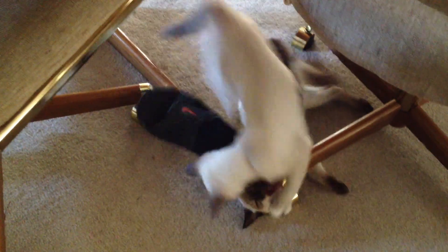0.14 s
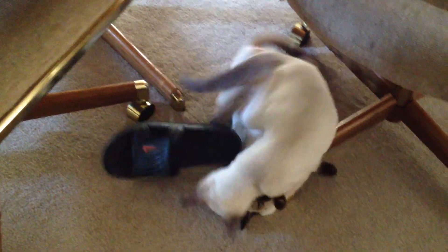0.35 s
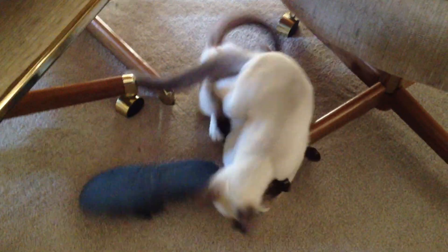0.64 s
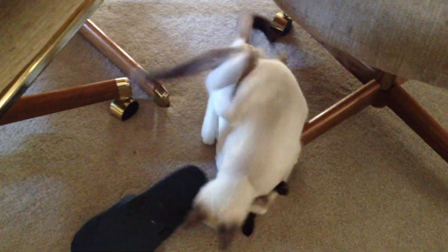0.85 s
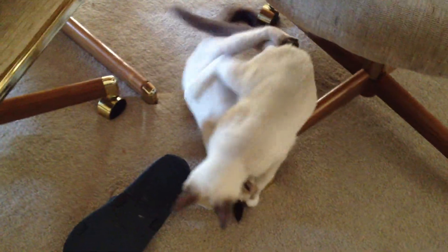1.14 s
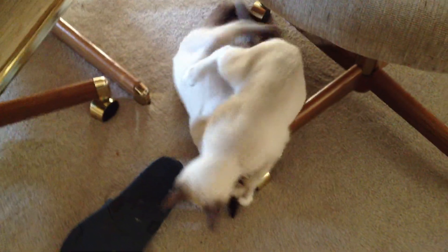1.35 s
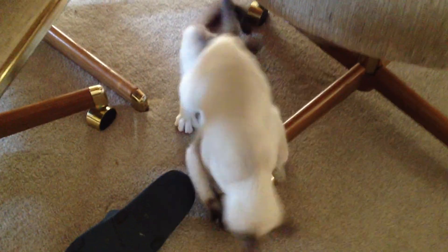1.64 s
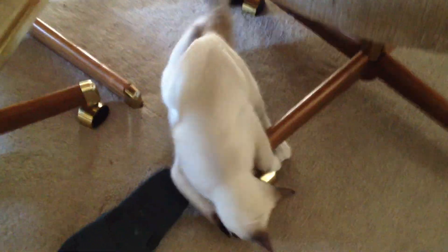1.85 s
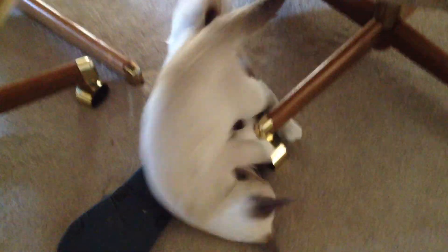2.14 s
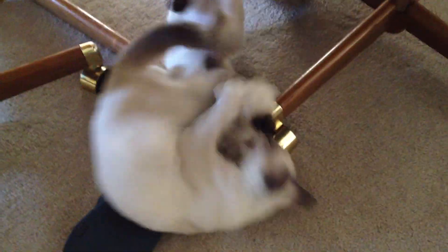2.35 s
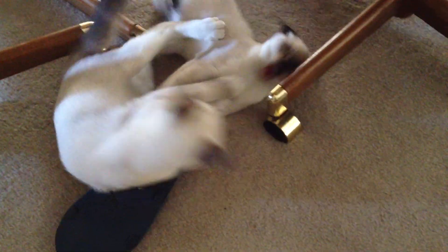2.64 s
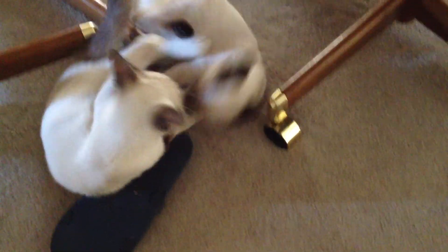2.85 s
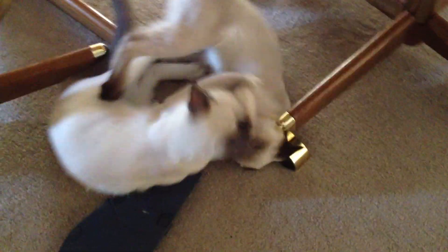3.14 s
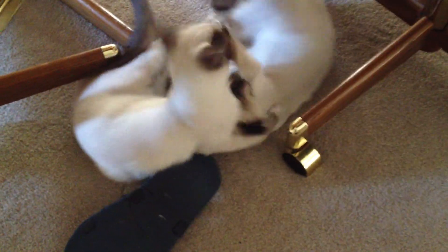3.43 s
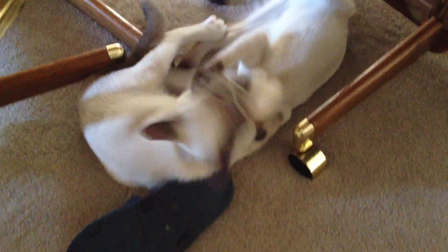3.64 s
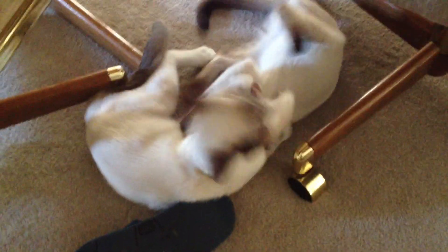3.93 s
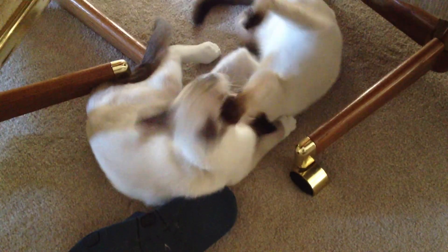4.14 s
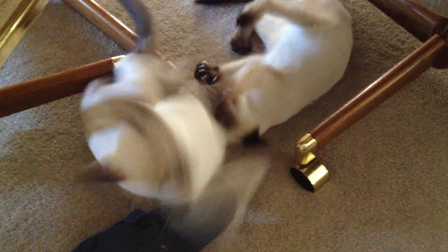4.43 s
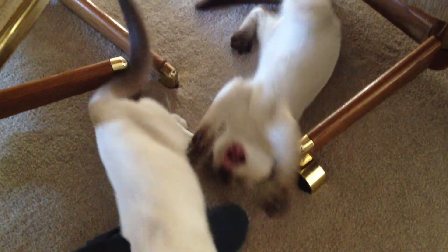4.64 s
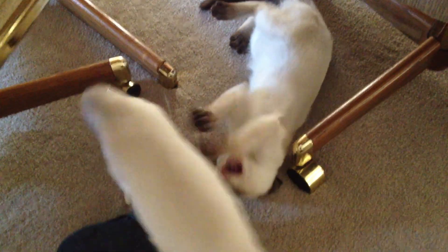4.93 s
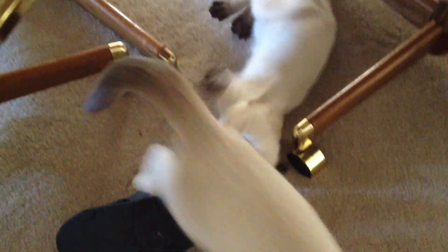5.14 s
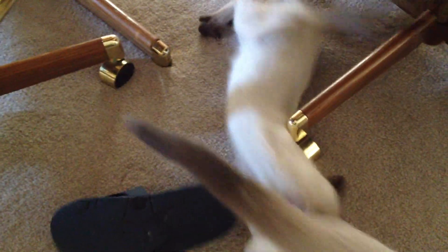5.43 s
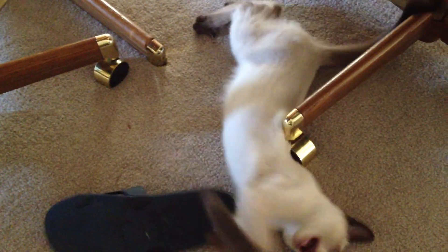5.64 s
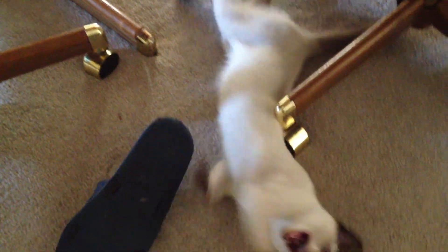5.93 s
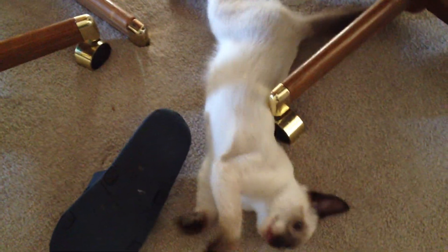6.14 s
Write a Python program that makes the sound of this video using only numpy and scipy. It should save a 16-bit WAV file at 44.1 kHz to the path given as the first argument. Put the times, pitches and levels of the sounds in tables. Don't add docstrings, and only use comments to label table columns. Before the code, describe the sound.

A cat's long hoarse yowl rises, falls and wavers into breath, then bodies scuffle on carpet and knock sharply against a wooden chair.

```python
import sys
import numpy as np
from scipy import signal
from scipy.fft import rfft, irfft
from scipy.io import wavfile
from scipy.ndimage import uniform_filter1d

SR = 44100
rng = np.random.default_rng(int(sys.argv[2]) if len(sys.argv) > 2 else 0)


def transcribe(u):
    v = np.clip(np.atleast_2d(u).T, -1, 1)
    q = np.round(v * 32767).astype(np.int16)
    wavfile.write(sys.argv[1], SR, q)


def volts_from_decibels(level):
    exponent = np.asarray(level, float) / 20
    return 10 ** exponent


N = 276948
TIME = np.arange(N) / SR


def rms_one(x):
    return x / np.sqrt(np.mean(x ** 2) + 1e-20)


def in_time(rows):
    s, *columns = np.transpose(rows)
    return [np.interp(TIME, s, c) for c in columns]


def gate(start, end, edge):
    return np.clip(np.minimum(TIME - start, end - TIME) / edge, 0, 1)


def at_hz(points, hz):
    table_hz, value = np.array(points).T[:2]
    return np.interp(np.log(hz + 1), np.log(table_hz), value)


def drift(rate_hz):
    r = np.exp(-2 * np.pi * rate_hz / SR)
    settle = 9000
    return rms_one(signal.lfilter([1], [1, -2 * r, r * r], rng.standard_normal(N + settle))[settle:])


def ring(x, hz, t60):
    r = volts_from_decibels(-60 / (max(t60, .002) * SR))
    w = 2 * np.pi * hz / SR
    return signal.lfilter([0, np.sin(w)], [1, -2 * r * np.cos(w), r * r], x + 1e-18)


def band(x, low_hz, high_hz):
    sos = signal.butter(2, [low_hz, min(high_hz, .45 * SR)], "band", fs=SR, output="sos")
    return signal.sosfilt(sos, x)


def peak(hz, centre_hz, width_hz):
    return 1 / (1 + ((hz - centre_hz) / width_hz) ** 2)


def add(out, s, sound):
    i = round(s * SR)
    out[i:i + len(sound)] += sound[:N - i]


def hush():
    # frequency_hz, density_db
    spectrum = [(18, -67), (30, -22), (59, -29), (106, -7), (227, 2), (384, -11), (499, -5), (740, -9.5),
                (3310, -17.5), (5450, -18), (6900, -25.5), (8080, -19), (9710, -27), (14400, -21),
                (16000, -27)]
    hz = np.linspace(0, SR / 2, N // 2 + 1)
    noise = irfft(rfft(rng.standard_normal(N)) * volts_from_decibels(at_hz(spectrum, hz)), N)
    return volts_from_decibels(-67) * rms_one(noise)


def scuffle():
    # time_s, weight_on_floor_db, fur_speed_db
    effort = [(0.0, -66.5, -78), (0.14, -59.5, -74.5), (0.28, -64, -72), (0.44, -67.5, -68),
              (1.35, -67, -75), (2.33, -68, -70.5), (2.75, -71, -69), (3.02, -66.5, -73),
              (3.32, -60, -72.5), (3.6, -69.5, -73), (3.9, -62, -73.5), (4.07, -76, -75), (4.3, -73, -77),
              (4.48, -69, -70), (4.81, -72, -80.5), (5.18, -70, -76), (5.6, -66.5, -76.5),
              (6.28, -74.5, -77.5)]
    # low_hz, high_hz
    contact_bands = [
        (110, 342),
        (400, 2250),
        (6100, 7680),
        (11500, 28000),
    ]
    # start_s, length_s, rub_db
    hauls = [(0.291, .1, -60), (0.39, 0.054, -62), (1.725, 0.36, -68.5), (2.19, 0.31, -77.5),
             (3.19, 0.27, -67.5), (3.797, 0.26, -82), (4.428, 0.16, -74), (5.385, 0.13, -74)]
    # start_s, length_s, swish_db,
    # bristle_db
    strokes = [(2.11, 0.044, -74, -87), (2.301, 0.068, -68, -73), (2.446, 0.12, -74.5, -70),
               (0.033, 0.13, -77.5, -81), (2.785, 0.13, -61, -78), (4.52, 0.069, -68, -86),
               (3.603, 0.24, -75.5, -78), (3.933, 0.18, -71, -81), (4.289, 0.065, -68, -89),
               (4.41, 0.057, -72, -81), (4.645, 0.074, -74, -69), (5.152, 0.09, -82, -83),
               (5.485, 0.11, -72, -74), (5.743, 0.068, -78, -70), (5.89, 0.055, -72.5, -89),
               (6.017, 0.03, -81, -82)]
    weight_db, speed_db = in_time(effort)
    rub_db = 0.33 * weight_db + 0.67 * speed_db
    gains = [volts_from_decibels(weight_db - 2), volts_from_decibels(rub_db - 8), volts_from_decibels(speed_db - 2.5), volts_from_decibels(speed_db - 10.5)]
    edge_s = 0.024
    for s, length, db in hauls:
        gains[1] += volts_from_decibels(db) * gate(s, s + length, edge_s)
    for s, length, swish_db, bristle_db in strokes:
        stroke = gate(s, s + length, edge_s)
        gains[2] += volts_from_decibels(swish_db) * stroke
        gains[3] += volts_from_decibels(bristle_db) * stroke
    out, clump = 0, drift(14.6)
    for gain, (low_hz, high_hz) in zip(gains, contact_bands):
        caught = rng.random(N) < 900 / SR
        grains = caught * rng.choice([-1, 1], N) * volts_from_decibels(1.9 * np.minimum(rng.exponential(1, N), 5))
        rub = rms_one(band(rng.standard_normal(N) + 1.2 * rms_one(grains), low_hz, high_hz))
        out += rub * gain * volts_from_decibels(2.0 * clump + 2.1 * drift(21))
    return out


def ticks():
    # start_s, peak_db
    claws = [(2.336, -53), (2.475, -48), (2.494, -44), (3.795, -42.5), (4.299, -47), (5.161, -52),
             (5.511, -41.5), (5.532, -47), (5.538, -40.5), (5.548, -46.5)]
    # start_s, peak_db, centre_hz, breadth_octaves
    taps = [(0.052, -45.5, 790, 1.4), (.177, -45, 1030, 1), (.216, -47, 2600, 2), (.356, -54, 4420, 1.2),
            (0.376, -44, 4330, 2.1), (1.507, -42, 618, 1.95), (1.771, -50, 703, 1.2),
            (3.374, -40, 3800, 0.45), (3.838, -50, 1000, 1.1), (3.798, -50, 1500, 1.2),
            (3.903, -38, 2770, 0.8)]
    contacts = [(s, db, 6660, 0.8, 0.0055) for s, db in claws]
    for s, db, hz, octaves in taps:
        contacts.append((s, db, hz, octaves, 0.0035 + 4.4 / hz))
    out, age = np.zeros(N), np.arange(2000) / SR
    for s, db, hz, octaves, length in contacts:
        spread = 2 ** (octaves / 2)
        burst = rng.standard_normal(len(age)) * np.exp(-age / (length / 3))
        snap = band(burst, hz / spread, hz * spread)
        add(out, s, volts_from_decibels(db) * snap / np.abs(snap).max())
    return out


def thuds():
    # start_s, peak_db, pitch_hz, t60_s
    falls = [(0.069, -45.5, 275, 0.089), (0.093, -43, 236, 0.038), (0.129, -49, 196, 0.073),
             (0.189, -48.5, 190, 0.055), (0.321, -38.5, 200, 0.027), (0.346, -46, 213, 0.042),
             (0.373, -37.5, 257, 0.043), (0.429, -45.5, 236, 0.044), (0.695, -55, 226, 0.18),
             (1.372, -51.5, 244, 0.068), (1.524, -38, 199, 0.061), (1.63, -62, 223, 0.035),
             (2.33, -54, 215, 0.077), (2.884, -51.5, 234, 0.21), (3.067, -54, 214, 0.11),
             (3.198, -43, 235, .1), (3.299, -48, 260, 0.1), (3.793, -44.5, 175, 0.059),
             (3.908, -39.5, 242.5, 0.17), (2.63, -41, 228.3, 0.18), (4.538, -24, 212, 0.05),
             (4.586, -43.5, 326, 0.044), (4.609, -46, 280, 0.042), (4.685, -49, 204, 0.025),
             (4.842, -48.5, 202, 0.039), (5.17, -53, 221, 0.03), (5.65, -50.5, 148, 0.094),
             (5.835, -56, 230, 0.2)]
    push = np.zeros(9000)
    push[:60] = np.hanning(60) / 30
    out = np.zeros(N)
    for s, db, hz, t60 in falls:
        overtone = 0.22 * ring(push, 1.414 * hz, 1.7 * t60)
        add(out, s, volts_from_decibels(db) * (ring(push, hz, t60) + overtone))
    return out


def yowl():
    # time_s, pitch_hz, level_db, mouth_open_db, chest_db
    pushes = [
        [(.225, 646.4, -67, 12, 0), (.3, 797, -63.5, 16, -5), (.316, 873, -63, 17, -20),
         (.385, 895, -61, 20, -22), (.405, 948, -60.5, 20, -20), (.413, 1040, -57, 16.5, -9),
         (.48, 1099, -53.5, 14, -2), (.5, 1037, -52, 2, -17), (.526, 1013, -53, 8, -18)],
        [(.561, 855, -47, 3, -32), (.632, 793, -51.5, -4, -14.5), (.704, 655, -56, -4, -7),
         (.722, 645, -56, 0, -8), (.738, 682, -56, 5, -9), (.758, 626, -57, 8, -11), (.836, 612, -63, 14.5, -4),
         (.858, 650, -61.5, 11, -8), (.908, 640, -60, 11, -4)],
        [(.935, 615, -59.5, 10, -2.5), (.975, 636, -51, 0, -15), (1.01, 627, -49.5, -5.5, -19.5),
         (1.032, 605, -54.5, -11.5, -17), (1.08, 593, -56, -18, -12)],
        [(1.097, 558, -58, -20, -10), (1.112, 535, -51, -18, -11.5), (1.132, 501, -45, -14, -12),
         (1.168, 495.3, -48.5, -16, -13), (1.2, 512, -44.5, -13, -15), (1.222, 537, -43.5, -10, -20),
         (1.27, 510.6, -44.5, -15, -15), (1.36, 489.5, -56, -23.5, -3.5), (1.49, 469.5, -68.5, -22, -0.5)],
    ]
    # time_s, mouth_hz, top_brightness_db
    tongue = [(.225, 2300, -6), (.4, 2250, -5), (.5, 2250, 0), (.65, 2370, 0), (.75, 2250, 5.5),
              (.9, 2250, 4.5), (1.02, 2250, 4), (1.12, 2250, 0), (1.49, 2180, -2)]
    # centre_hz, width_hz, level_db
    throat = [(4200, 355, -12.5), (4920, 730, -29.5), (6480, 590, -28)]
    rows = np.concatenate(pushes)
    start_s, end_s = rows[0][0], rows[-1][0]
    end = round(end_s * SR)
    pitch, level_db, open_db, chest_db = np.array(in_time(rows))[:, :end]
    mouth_hz, bright_db = np.array(in_time(tongue))[:, :end]
    ends = np.exp(-np.abs(TIME[:end] - start_s) / .04) + np.exp((TIME[:end] - end_s) / .16)
    rough = .26 - .011 * (level_db + 55) + .55 * ends
    longer = 1 + 0.0056 * np.clip(open_db, -14, 0)
    pitch = pitch * (1 + .0055 * drift(45)[:end] + .05 * rough * drift(110)[:end])
    warble_hz = 70 + 12 * drift(8)[:end]
    pitch *= 1 + .009 * np.sin(2 * np.pi * np.cumsum(warble_hz) / SR)
    phase, out, power = 2 * np.pi * np.cumsum(pitch) / SR, 0, 1e-12
    wander, flutter = drift(13.0), drift(100)
    for k in range(1, 17):
        hz = k * pitch
        gain = peak(hz, mouth_hz, 665) ** 2.8 + volts_from_decibels(chest_db) * peak(hz, 1090, 660)
        lowest, *top = [volts_from_decibels(db) * peak(hz, at * longer, width) for at, width, db in throat]
        gain += volts_from_decibels(open_db) * (lowest + volts_from_decibels(bright_db) * sum(top))
        gain *= 1 - 0.49 * peak(hz, 3260, 320)
        power += gain ** 2 / 2 * (np.abs(hz - 2400) < 900)
        blur = 1 + rough * (.2 + hz / 4000) * flutter[9001 * k:][:end]
        line = np.sin(k * phase + rng.uniform(0, 2 * np.pi))
        out += gain * (hz < 9200) * blur * volts_from_decibels(2.5 * wander[7001 * k:][:end]) * line
    evened = out / np.sqrt(uniform_filter1d(power, size=600)) * volts_from_decibels(level_db)
    return np.pad(evened, (0, N - end)) * gate(start_s, end_s, 0.004)


def pants():
    # start_s, length_s, level_db, mouth_open_db
    breaths = [(0.236, 0.11, -65, 8), (.66, 0.15, -68.5, 4), (1.338, 0.17, -64, -12),
               (1.471, 0.21, -64, -10.5), (1.773, 0.24, -70.5, 2), (6.124, 0.12, -67, 5.5)]
    # centre_hz, width_hz, level_db
    mouth = [(2250, 430, 10.5), (4520, 350, 1), (6800, 1400, -2.5), (12600, 6800, -18)]
    air, hz = rfft(rng.standard_normal(N)), np.linspace(0, SR / 2, N // 2 + 1)
    first, *upper = [irfft(air * volts_from_decibels(db) * peak(hz, at, width) ** 1.36, N) for at, width, db in mouth]
    out = 0
    for s, length, level_db, open_db in breaths:
        swell_db = -4 * np.clip(2 * (TIME - s) / length - 1, -1, 1) ** 2
        breath = first + volts_from_decibels(open_db) * sum(upper)
        out += volts_from_decibels(level_db + swell_db) * breath * gate(s, s + length, 0.017)
    return out / first.std() * volts_from_decibels(0.5 * drift(30))


def caster():
    # start_s, peak_db
    contact = (.259, -28)
    # pitch_hz, level_db, t60_s
    modes = [(1400, -47, 0.032), (2556, -3.5, 0.028), (4040, -5.5, 0.018), (5870, -9, 0.0049),
             (7330, -10, 0.021), (8300, -11.5, 0.027)]
    s, peak_db = contact
    click = np.zeros(N)
    blow_and_rebound = np.array([0.82, 0.41, 0.18, -0.32, -0.8] + [0] * 30 + [.7])
    add(click, s, volts_from_decibels(peak_db) * blow_and_rebound)
    return sum(volts_from_decibels(db) * ring(click, hz, t60) for hz, db, t60 in modes)


def snaps():
    # start_s, peak_db, tilt_db
    loops = [(.2595, -38, 8), (.264, -48, 6), (0.417, -46, 2), (0.43, -46, 2), (1.5063, -46, 2),
             (2.2477, -42, 0), (2.318, -52, 2), (2.359, -48, 3), (2.475, -43, 1), (2.493, -40, -1),
             (3.5994, -52, 3), (3.6344, -48, 2), (4.5363, -46, 3), (4.6387, -50, -5), (5.2244, -51, 1),
             (5.409, -42, -1), (5.449, -48, 0), (5.512, -44, 3), (5.517, -38, -6), (5.5852, -50, 4),
             (5.787, -49, -4), (5.842, -43, -3), (5.9194, -54, 0), (6, -50, 4)]
    dull, bright = np.zeros((2, N))
    for s, db, tilt_db in loops:
        add(dull, s, volts_from_decibels([db - tilt_db]))
        add(bright, s, volts_from_decibels([db + tilt_db]))
    return volts_from_decibels(13.5) * band(dull, 570, 3150) + volts_from_decibels(6.5) * band(bright, 3300, 16000)


def pings():
    # start_s, peak_db, pitch_hz, t60_s
    lone_modes = [(2.612, -31, 1486, .12), (2.614, -48, 2600, .06), (2.787, -40, 591, 0.18),
                  (2.787, -40, 430, .1), (2.787, -38, 1364, .16), (2.787, -40, 1436, .16),
                  (2.787, -44, 4160, .06), (2.787, -49, 3330, .08), (2.787, -48, 2330, .1),
                  (3.194, -45, 1100, 0.076), (3.196, -56, 3300, .06), (3.197, -53, 2200, .06),
                  (3.208, -48.5, 1480, .1), (3.317, -52, 1490, .08), (3.376, -42, 3720, .05),
                  (3.378, -51, 1410, .08), (3.412, -47, 1084, .05), (3.416, -53, 2960, .04),
                  (3.903, -33, 1840, 0.053), (3.903, -35, 2720, .04), (3.903, -38, 1090, .12),
                  (3.904, -42, 511, .1), (3.904, -40, 2060, .1), (3.904, -43, 2240, .06),
                  (4.536, -36, 1050, .022), (4.536, -41, 1250, .022), (4.537, -35, 580, .03),
                  (4.54, -54, 1840, .03), (1.506, -38, 600, .02), (1.506, -41, 1200, .02),
                  (1.506, -41, 1900, .02), (2.266, -54, 1200, .05), (2.267, -52, 500, .1),
                  (2.474, -52, 2400, .02), (5.449, -53, 2300, .04), (5.449, -54, 1350, .04),
                  (5.451, -57, 600, .05), (3.838, -52, 1200, .02), (3.838, -53, 700, .02),
                  (2.787, -50, 1830, .5)]
    out, knock = np.zeros(N), np.pad(np.hanning(8) / 3.5, (0, 12000))
    for s, db, hz, t60 in lone_modes:
        twin = volts_from_decibels(-5) * ring(knock, hz * 1.025, t60)
        add(out, s, volts_from_decibels(db) * (ring(knock, hz, t60) + twin))
    return out


def chair():
    # start_s, seat_db, frame_db, rail_db, brass_db
    blows = [(1.768, -53, -58, -70, -66), (2.267, -52, -60, -65, -61), (2.604, -36.5, -37, -57, -40),
             (2.611, -50, -30, -27, -36.5), (2.622, -37, -27.5, -42, -50), (2.738, -48, -49, -56, -67),
             (2.785, -45, -26, -37, -20), (2.789, -53, -27, -31, -22), (2.798, -32, -27, -51, -41),
             (3.193, -49, -45.5, -51, -64), (3.198, -39, -50, -50, -76), (3.207, -43.5, -42.5, -49, -76),
             (3.29, -54, -54, -62, -74), (3.299, -47, -58, -66, -76), (3.317, -52, -56, -66, -76),
             (3.374, -48, -45.5, -43.5, -42), (3.381, -50, -48, -50, -50), (3.412, -48, -54, -62, -70),
             (3.612, -54, -61.5, -68, -76), (3.622, -51, -62, -72, -76), (3.892, -48, -52, -54, -70),
             (3.902, -30.5, -33, -24, -39), (3.917, -37, -41, -38, -50), (5.449, -42, -49.5, -52, -54)]
    # pitch_hz, level_db, t60_s
    modes = [(231, -6, 0.4), (300, -15, 0.24), (446, -2, 0.058), (518, 1, 0.093), (592, -4.5, 0.24),
             (870, -18, 0.13), (1111, -7, 0.14), (1175, 5, 0.046), (1285, -5, 0.04), (1389, 8.5, 0.036),
             (1353, -9, 0.071), (1473, 5, 0.03), (1710, 2, 0.023), (1836, -21, 0.5), (2030, -2, 0.051),
             (2300, -7, 0.028), (2650, -6, 0.021), (3760, -13, 0.056), (4370, 0, 0.025), (5830, -14, 0.061),
             (7290, 20, 0.0034), (7840, 11, 0.0067)]
    part_edges = [700, 1900, 2900, 5200]
    # low_hz, high_hz, ring_db, crack_db, first_contact_s, rattle_s, rattle_db
    parts = [
        (210, 790, -12.5, 27, 0.0032, 0.021, -4),
        (904, 1850, -11.5, 27.5, 0.0044, 0.028, -4),
        (1660, 2940, -8.5, 27, 0.0027, 0.019, 2),
        (2960, 8300, -11.5, 20.5, 0.0004, 0.023, -14.5),
        (4930, 5200, -12.5, 0, 0.0062, 0.024, -19),
    ]
    age, out = np.arange(8000) / SR, 0
    force = volts_from_decibels(0.93 * rng.standard_normal((len(blows), 5, 1)))
    contacts = force * rng.standard_normal((len(blows), 5, len(age)))
    owner = np.searchsorted(part_edges, [hz for hz, db, t60 in modes])
    for p, (low_hz, high_hz, ring_db, crack_db, first, rattle, rattle_db) in enumerate(parts):
        fading = np.exp(-age / first) + volts_from_decibels(rattle_db) * np.exp(-age / rattle)
        fading /= np.sqrt(np.sum(fading ** 2))
        drive = np.zeros(N)
        for (s, *levels_db), burst in zip(blows, contacts):
            level_db = levels_db[min(p, 3)]
            add(drive, s, volts_from_decibels(level_db) * burst[p] * fading)
        out += volts_from_decibels(crack_db) * band(drive, low_hz, high_hz)
        for o, (hz, db, t60) in zip(owner, modes):
            if o == p:
                out += volts_from_decibels(ring_db + db) * ring(drive, hz, t60)
    return out + volts_from_decibels(12.0) * band(drive, 7300, 26000)


def bumps():
    # start_s, peak_db, pitch_hz, t60_s
    shakes = [(3.79, -55, 119, 0.2), (3.9, -61, 33, 0.11), (2.785, -69.5, 30, 0.14)]
    out = np.zeros(N)
    for s, db, hz, t60 in shakes:
        push = np.hanning(round(SR / hz))
        push = np.pad(push / push.sum() * 2, (0, 12000))
        add(out, s, volts_from_decibels(db) * band(ring(push, hz, t60), hz / 2, hz * 2.5))
    return out


def squeaks():
    # start_s, start_hz, end_hz, length_s, level_db
    whistles = [(4.76, 4450, 4120, .06, -68), (4.315, 4800, 4450, .025, -67), (4.33, 4200, 2900, .02, -68),
                (3.13, 2500, 1500, .008, -55)]
    out = np.zeros(N)
    for s, start_hz, end_hz, length, db in whistles:
        hz = np.linspace(start_hz, end_hz, round(length * SR))
        add(out, s, volts_from_decibels(db) * np.hanning(len(hz)) * np.sin(2 * np.pi * np.cumsum(hz) / SR))
    return out * (1 + 0.18 * drift(90))


def room(x):
    # frequency_hz, t60_s
    decay = [(200, 0.35), (1500, 0.38), (5000, 0.36), (12000, 0.11)]
    age, tail = np.arange(SR // 2) / SR, 0
    for low_hz in 90 * 2. ** np.arange(8):
        octave = band(rng.standard_normal(len(age)), low_hz, 2 * low_hz)
        tail += octave * volts_from_decibels(-60 * age / at_hz(decay, 1.07 * low_hz))
    tail *= np.clip((age - .002) / 0.0046, 0, 1)
    return signal.fftconvolve(x, tail / np.sqrt(np.sum(tail ** 2)))[:N]


def scene():
    cat = yowl() + pants() + squeaks()
    hard = chair() + pings() + caster()
    soft = ticks() + snaps() + thuds()
    lean_blows = signal.butter(4, 165, "high", fs=SR, output="sos")
    hard, soft = signal.sosfilt(lean_blows, [hard, soft])
    reflections = volts_from_decibels(-13.5) * room(hard + 0.75 * cat + 0.92 * soft)
    close = cat + hard + soft + reflections + scuffle()
    no_bass = signal.butter(6, 130, "high", fs=SR, output="sos")
    close = signal.sosfilt(no_bass, close)
    port = signal.butter(3, [8850, 10700], "bandstop", fs=SR, output="sos")
    heard = signal.sosfilt(port, close) + volts_from_decibels(-24.0) * close
    return (heard + bumps() + hush())[None]


def top_cut(x):
    return signal.sosfilt(signal.butter(12, 16500, fs=SR, output="sos"), x)


def record(dry):
    shelf = signal.ellip(8, .3, 60, 15280, fs=SR, output="sos")
    low = signal.sosfiltfilt(shelf, dry)
    mix = low + volts_from_decibels(-36) * (dry - low)
    return top_cut(mix)


dry = scene()
out = record(dry)
transcribe(out)
```